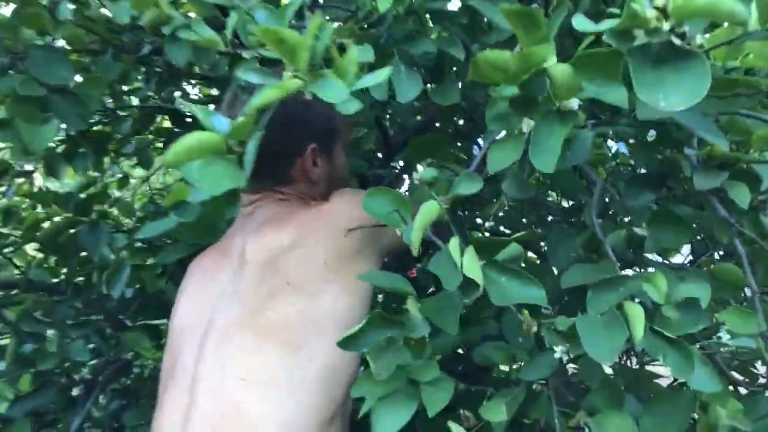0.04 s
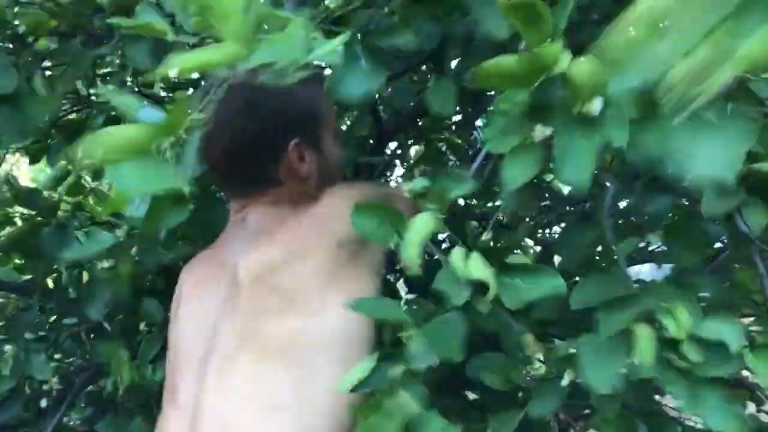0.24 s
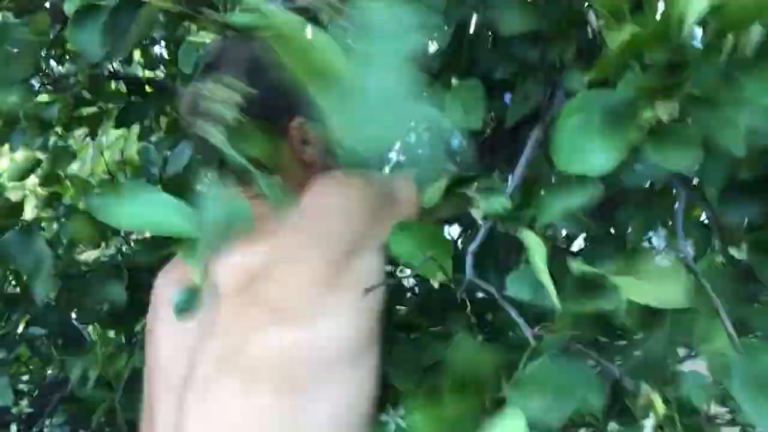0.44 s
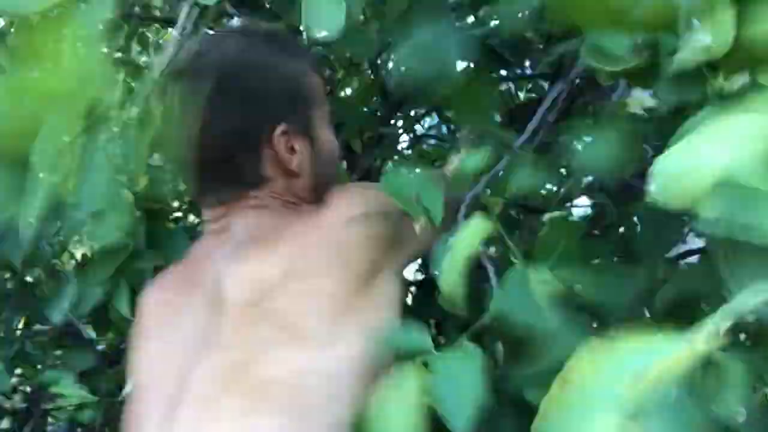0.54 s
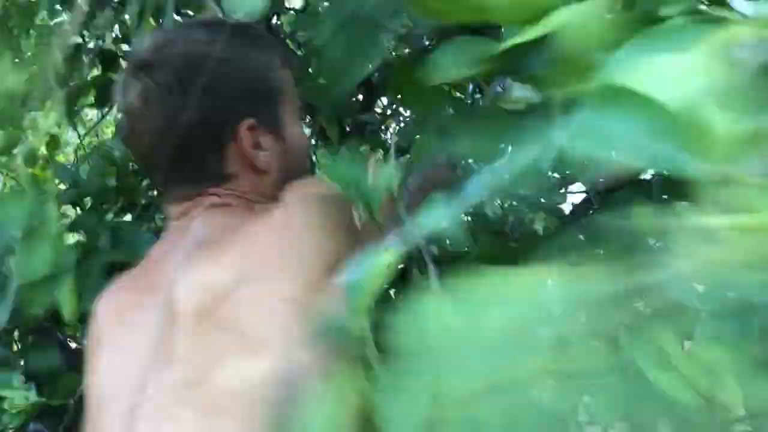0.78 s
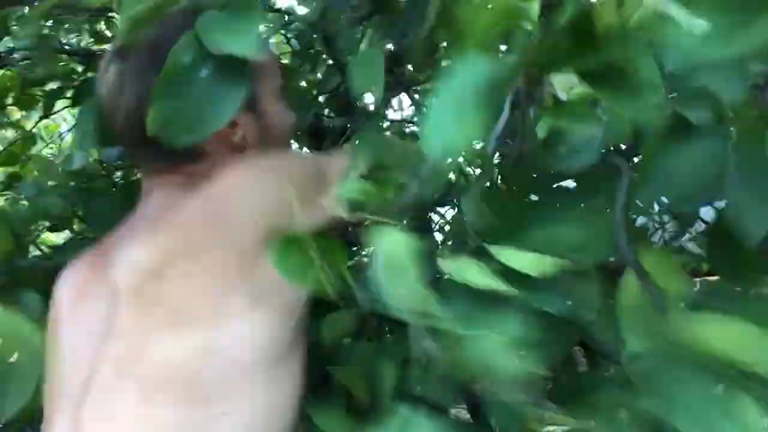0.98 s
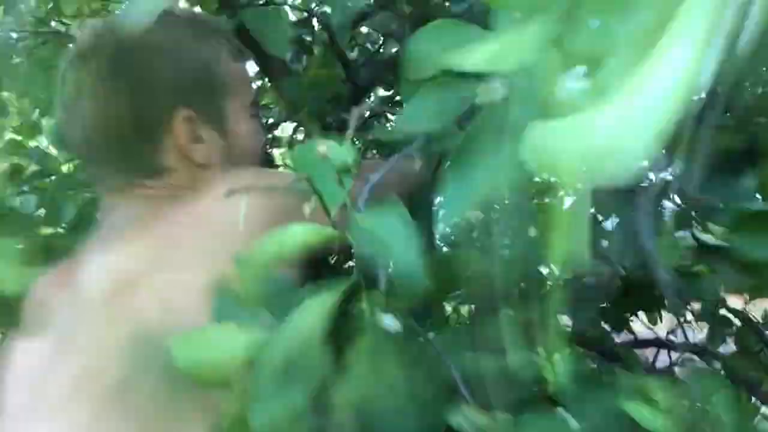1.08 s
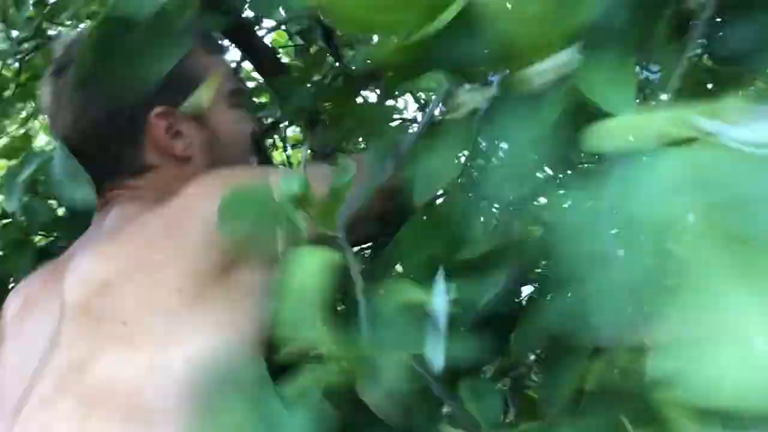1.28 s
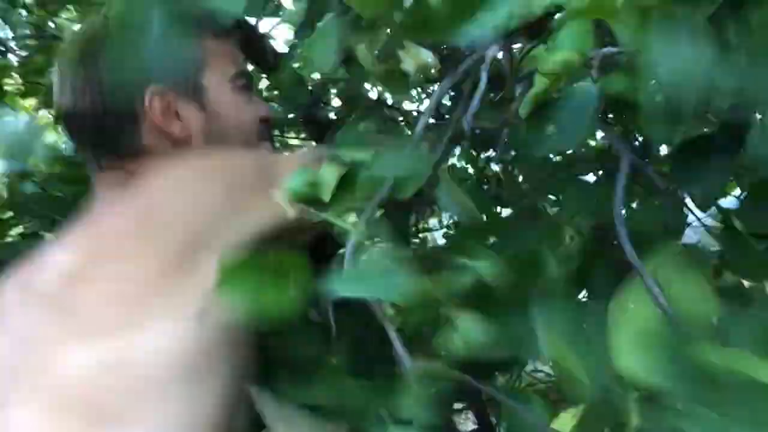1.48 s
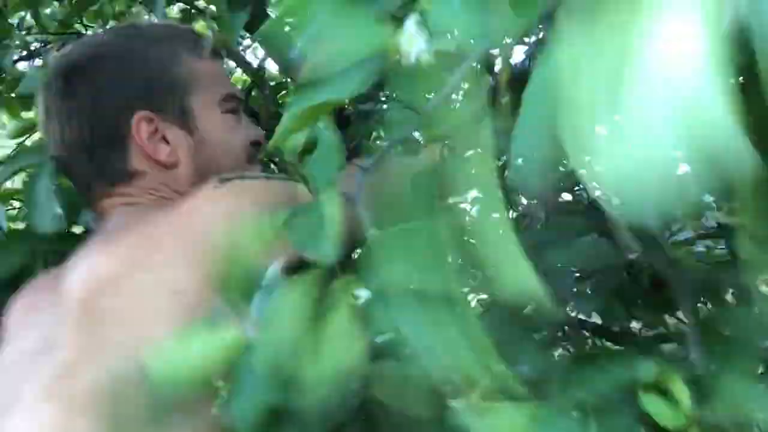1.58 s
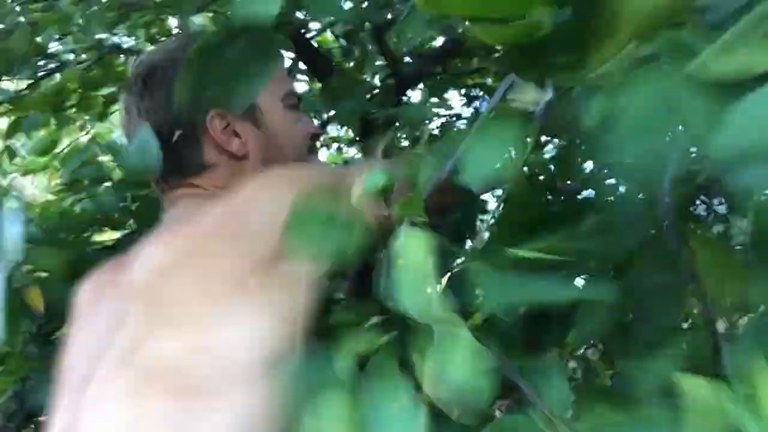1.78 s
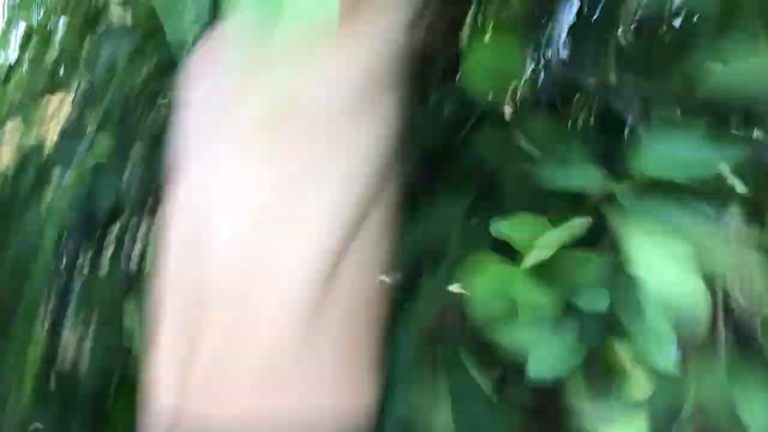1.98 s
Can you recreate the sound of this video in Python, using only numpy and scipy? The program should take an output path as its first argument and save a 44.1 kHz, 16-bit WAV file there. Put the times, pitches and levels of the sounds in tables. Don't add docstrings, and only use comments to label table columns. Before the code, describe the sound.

Rustling foliage outdoors, heard close and in mono. Near silence with a few small leaf brushes, then growing hiss of shaken leaves, staying loud to the end with snapping clicks and dull bumps over a faint steady murmur.

```python
import sys
import numpy as np
from scipy import signal
from scipy.fft import rfft, irfft
from scipy.io import wavfile
from scipy.ndimage import uniform_filter1d

SR = 44100
rng = np.random.default_rng(int(sys.argv[2]) if len(sys.argv) > 2 else 0)


def store_wav(level_fs):
    pcm = np.round(np.clip(np.atleast_2d(level_fs), -1, 1) * 32767)
    wavfile.write(sys.argv[1], SR, pcm.T.astype(np.int16))


def volts_from_db(level):
    exponent = np.asarray(level, float) / 20
    return 10 ** exponent


N = 89346


def rms_one(x):
    return x / np.sqrt(np.mean(x ** 2) + 1e-20)


def level_at(spectrum, hz):
    points_hz, level_db = np.transpose(spectrum)
    return np.interp(np.log(hz), np.log(points_hz), level_db)


def bandpass(x, low_hz, high_hz, order=2):
    return signal.sosfilt(signal.butter(order, [low_hz, high_hz], "band", fs=SR, output="sos"), x)


def drift(rate_hz):
    step = 40
    settle = 2000
    pole = np.exp(-2 * np.pi * rate_hz * step / SR)
    white = rng.standard_normal(N // step + settle + 2)
    slow = signal.lfilter([1], [1, -2 * pole, pole ** 2], white)[settle:]
    return np.interp(np.arange(N) / step, np.arange(len(slow)), rms_one(slow))


def ring(clicks, hz, cycles):
    pole = volts_from_db(-60 * hz / (cycles * SR))
    turn = 2 * np.pi * hz / SR
    return signal.lfilter([0, np.sin(turn)], [1, -2 * pole * np.cos(turn), pole ** 2], clicks + 1e-18)


def colour(x, spectrum):
    hz = np.maximum(np.arange(N // 2 + 1) * SR / N, 10)
    spec = rfft(x)
    own = np.sqrt(uniform_filter1d(np.abs(spec) ** 2, size=1500))
    return rms_one(irfft(spec / own * volts_from_db(level_at(spectrum, hz)), N))


def noise_bands(spectrum, gain_db):
    white = rng.standard_normal((2, N))
    edges = 30 * 2 ** np.arange(0, 9.6, 0.5)
    edges[-1] = 0.45 * SR
    out, rest_power = 0, 0
    for k, (low, high) in enumerate(zip(edges, edges[1:])):
        hz = np.sqrt(low * high)
        band = volts_from_db(level_at(spectrum, hz)) * bandpass(white[k % 2], low, high)
        out = out + band * volts_from_db(gain_db(hz))
        rest_power += np.mean(band ** 2)
    return out / np.sqrt(rest_power)


# frequency_hz [Hz], density_db [dB per Hz]
GARDEN_SPECTRUM = [(24, -21.5), (40, -3), (129, 10), (207, -38), (2840, -27), (5050, -38), (15500, -68)]


def garden():
    return volts_from_db(-68.5) * noise_bands(GARDEN_SPECTRUM, lambda hz: 0)


def bough_air(vigour_db):
    SWAY_DB, SWAY_TOP_HZ, LUMPS_DB = -28, 110, 2.0
    CALM_S, CALM_DB = 1.84, -15
    air = bandpass(rng.standard_normal(N), 40, SWAY_TOP_HZ)
    calm_db = CALM_DB * (np.arange(N) > CALM_S * SR)
    return volts_from_db(vigour_db + SWAY_DB + LUMPS_DB * drift(6) + calm_db) * rms_one(air)


# start_s, the moment of the puff's peak
# [s], level_db [dB], pitch_hz [Hz], length_s [s]
BRANCH_THUMPS = [(0.011, -54, 259, 0.026), (.012, -52.5, 860, 0.011), (0.054, -54.5, 305, 0.0059),
                 (.1602, -48, 2000, .0004), (0.831, -41.5, 403, 0.015), (.83, -40.5, 255, 0.017),
                 (0.946, -47, 79.5, 0.013), (0.986, -41, 150, 0.0067), (1.015, -51.5, 60, 0.029),
                 (1.158, -40, 168, 0.021), (1.168, -40, 95, 0.012), (1.176, -39.5, 226, 0.02),
                 (1.221, -42, 63, .02), (1.235, -32, 330, 0.0029), (1.359, -40, 143, 0.014),
                 (1.392, -40, 228, .01), (1.409, -36.5, 96, 0.02), (1.481, -48, 110, 0.022),
                 (1.626, -38, 90.5, 0.012), (1.65, -36, 95, 0.015), (1.66, -46, 190, 0.011),
                 (1.687, -45, 60.3, .03), (.73, -56, 80, 0.022), (0.856, -54, 60, 0.028),
                 (1.327, -51, 60, 0.028), (1.55, -52, 80, 0.02), (1.675, -38.5, 154, 0.0073),
                 (1.72, -46, 92.5, .02), (1.824, -49, 69.5, 0.012), (2.004, -42.5, 300, .012)]


def thumps():
    HALF_WIDTH_OCTAVES = 0.75
    half = 4000
    out = np.zeros(N + 2 * half)
    t = (np.arange(2 * half) - half) / SR
    for start_s, level_db, pitch_hz, length_s in BRANCH_THUMPS:
        spread = 2.0 ** HALF_WIDTH_OCTAVES
        turbulence = bandpass(rng.standard_normal(2 * half), pitch_hz / spread, pitch_hz * spread, order=3)
        puff = np.exp(-(t / length_s) ** 2) * turbulence
        i = int(start_s * SR)
        out[i:i + 2 * half] += volts_from_db(level_db) * puff / np.sqrt(np.sum(puff ** 2) / (length_s * SR))
    return out[half:N + half]


# start_s [s], peak_db [dB], pitch_hz [Hz], length_s [s], broad_db [dB]
LEAF_SLAPS = [(.0165, -44.5, 5500, 0.0016, 4), (0.041, -40.5, 3800, 0.0023, -1),
              (0.05, -41.5, 7040, .0012, 5), (0.1105, -46.5, 8600, 0.0099, 3.0),
              (1.913, -19, 7800, .002, -1), (0.2813, -26.5, 14000, 0.0009, 1),
              (0.2816, -36.5, 3080, 0.00091, -11), (0.289, -35, 8500, .002, 0),
              (0.45, -32, 4100, 0.0044, -4), (.8945, -22, 5280, 0.00026, 5.5),
              (0.928, -17, 6400, 0.0033, -1.5), (1.076, -19.5, 5850, 0.0037, 0),
              (1.1662, -22.5, 1640, 0.0012, -3), (1.1665, -17.5, 2490, 0.0028, -9),
              (1.1666, -15.5, 11870, 0.011, 4), (1.1695, -17, 7500, 0.003, -9),
              (1.187, -18, 6400, 0.0024, 0), (1.2950, -18, 2600, 0.0019, -4),
              (1.4125, -21, 4160, 0.0016, 2), (1.496, -22, 4300, 0.0022, -1),
              (1.558, -19, 5230, 0.0018, -15), (1.6536, -14.5, 4900, 0.00027, 0),
              (1.6546, -5.5, 7850, .0001, -7), (1.735, -32, 4900, .003, 3)]


def slaps():
    CLICKS_PER_S, RING_CYCLES, SLAP_DB = 22000, 16, -2
    FLUTTER_DB, FLUTTER_S = -1.5, 0.0058
    size = 4000
    out, t = np.zeros(N + size), np.arange(size) / SR
    for start_s, peak_db, pitch_hz, length_s, broad_db in LEAF_SLAPS:
        clicks = (rng.random(size) < CLICKS_PER_S / SR) * rng.uniform(-1, 1, size)
        clicks[0] = 1
        fade = np.exp(-(t / length_s) ** 3)
        flutter = volts_from_db(FLUTTER_DB) * np.exp(-t / FLUTTER_S)
        tone = ring(ring(clicks * fade, pitch_hz, RING_CYCLES), pitch_hz, RING_CYCLES)
        broad = bandpass(clicks * (fade + flutter), 2600, 15000)
        slap = tone / np.abs(tone).max() + volts_from_db(broad_db) * broad / np.abs(broad).max()
        i = int(start_s * SR)
        out[i:i + size] += volts_from_db(peak_db + SLAP_DB) * slap
    return out[:N]


# frequency_hz [Hz], density_db [dB per Hz]
LEAF_SPECTRUM = [(110, -25), (200, -4.5), (1300, -5), (2200, -2.5), (4300, 2), (7000, 0), (11000, -4.5),
                 (15800, -10.5)]


def far_leaves(vigour_db, clump_db):
    FAR_DB, PATCHY_DB, DULL_FOLLOWS = -1, -0.07, 0.66
    top_db = vigour_db.max()

    def swell_db(hz):
        bright = np.clip(np.log2(hz / 500) / 3, 0, 1)
        follows = DULL_FOLLOWS + (1 - DULL_FOLLOWS) * bright
        return (vigour_db - top_db) * follows + bright * clump_db + PATCHY_DB * drift(5)

    return volts_from_db(top_db + FAR_DB) * noise_bands(LEAF_SPECTRUM, swell_db)


# start_s, the moment of the
# fullest swell or lull [s], swell_db [dB], length_s [s]
BRUSHES = [(0.025, 6, 0.0046), (0.047, 16, 0.015), (0.119, 12.5, .008), (0.271, 5, 0.0042),
           (0.283, 2.5, 0.0064), (.46, 7.5, 0.0072), (0.513, 3, 0.0087), (0.656, 2.5, .008),
           (0.79, 8, 0.0034), (0.811, 3.5, 0.0065), (0.874, 3, 0.025), (0.933, 3.5, 0.015),
           (0.982, 7, 0.0024), (1.082, 5, .008), (1.137, 2.5, 0.011), (1.227, 1, .005), (1.356, 6, 0.0063),
           (1.408, 5, 0.013), (1.457, -5, 0.0047), (1.497, 5.5, 0.0073), (1.565, 4.5, .012),
           (1.599, 1.5, .006), (1.68, -6, .008), (1.753, 5.5, 0.013), (1.764, 3, 0.0068), (1.82, 1, 0.0077),
           (1.916, -7, 0.0034), (1.928, 6, 0.0092)]


def near_leaves(vigour_db, clump_db):
    TAPS_PER_S, TAP_SPREAD_DB, TAP_SHARE_DB, TAP_CYCLES = 5000, 2, -3.5, 7
    RISE_SHARE = 0.33
    sizes = volts_from_db(TAP_SPREAD_DB * np.minimum(rng.exponential(1, N), 3.0)) * rng.choice([-1, 1], N)
    clicks = sizes * (rng.random(N) < TAPS_PER_S / SR)
    leaf = rng.integers(0, 20, N)
    taps = 0
    for k, hz in enumerate(np.geomspace(900, 15000, num=20)):
        taps = taps + ring(clicks * (leaf == k), hz, TAP_CYCLES)
    t = np.arange(N) / SR
    brush_db = np.zeros(N)
    for start_s, swell_db, length_s in BRUSHES:
        width_s = length_s * np.where(t < start_s, RISE_SHARE, 1)
        brush_db += swell_db * np.exp(-((t - start_s) / width_s) ** 2)
    return volts_from_db(vigour_db + TAP_SHARE_DB + 2 * clump_db + brush_db) * colour(taps, LEAF_SPECTRUM)


def rush(vigour_db):
    CLUMP_DB, CLUMP_PER_S = 0.7, 49
    clump_db = CLUMP_DB * drift(CLUMP_PER_S)
    return near_leaves(vigour_db, clump_db) + far_leaves(vigour_db, clump_db)


# time_s [s], level_db [dB]
SHAKING = [(0, -61.5), (.14, -64.5), (.22, -56.5), (.3, -47), (.42, -40.5), (.47, -38), (.64, -33.5),
           (.9, -32.5), (1.0, -32.5), (1.15, -30.5), (1.28, -31), (1.42, -29), (1.52, -29.5), (1.58, -28.5),
           (1.72, -30), (1.85, -30.5), (1.93, -30.5), (2.03, -32.5)]


def scene():
    vigour_db = np.interp(np.arange(N) / SR, *np.transpose(SHAKING))
    tree = rush(vigour_db) + slaps() + thumps() + bough_air(vigour_db)
    return np.tile(tree + garden(), (2, 1))


def band_limit(x):
    return signal.sosfilt(signal.butter(12, 16910, fs=SR, output="sos"), x)


def record(dry):
    x = signal.sosfilt(signal.butter(3, 45, "high", fs=SR, output="sos"), dry)
    x = signal.sosfilt(signal.ellip(14, 0.3, 90, 15850, fs=SR, output="sos"), x)
    return band_limit(x)


dry = scene()
out = record(dry)
store_wav(out)
```